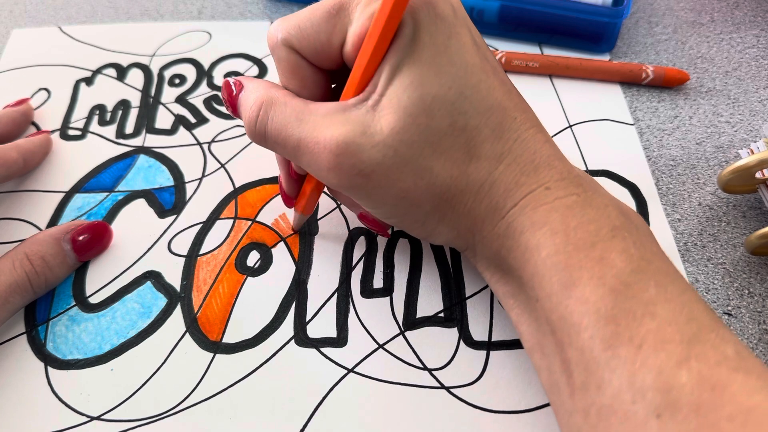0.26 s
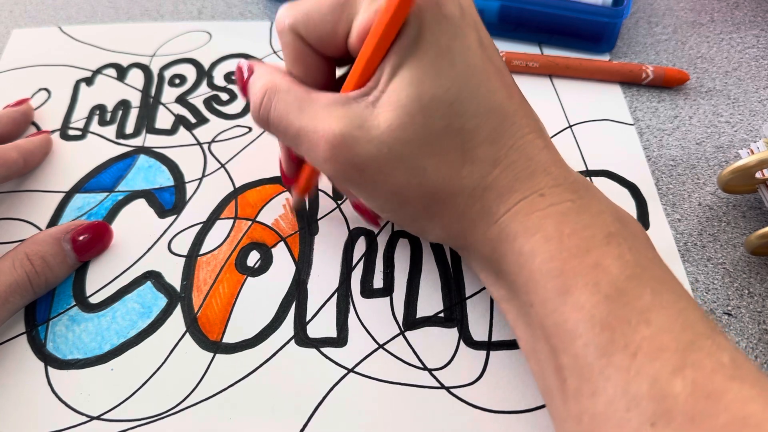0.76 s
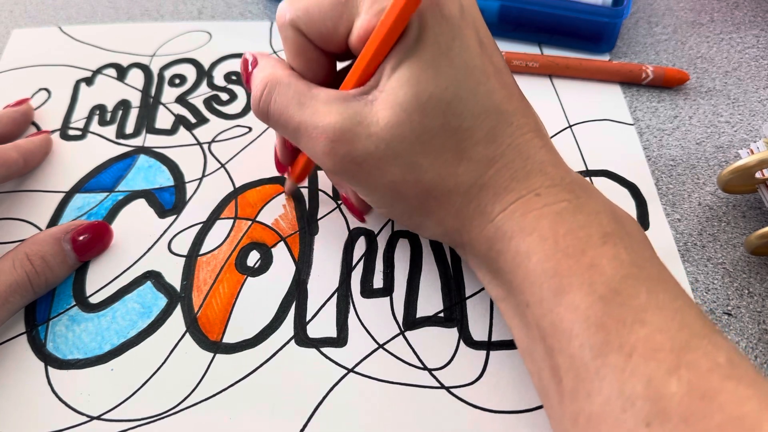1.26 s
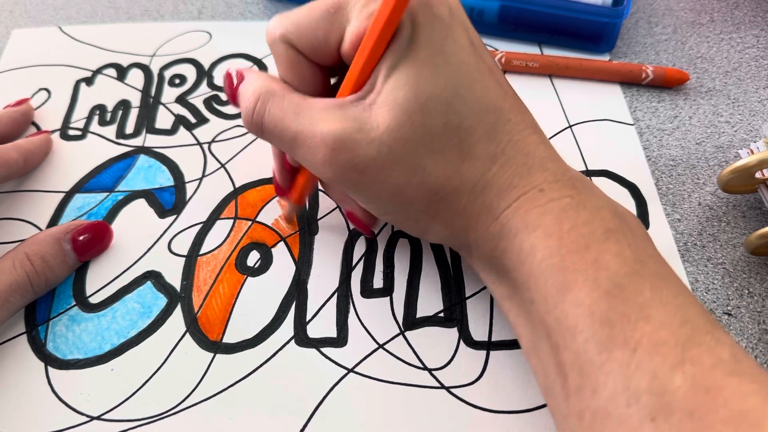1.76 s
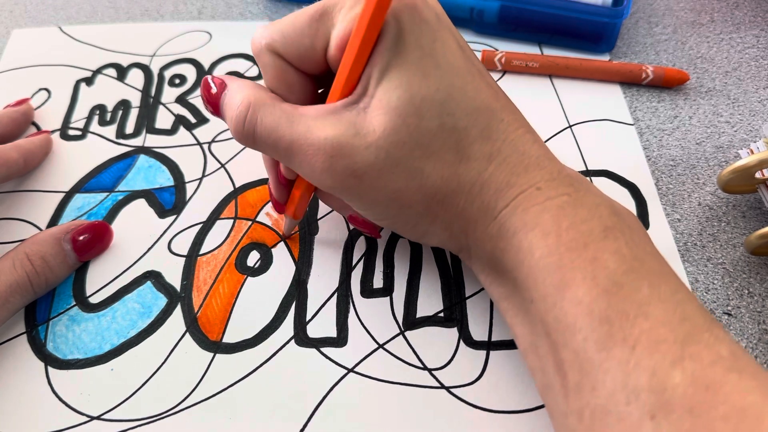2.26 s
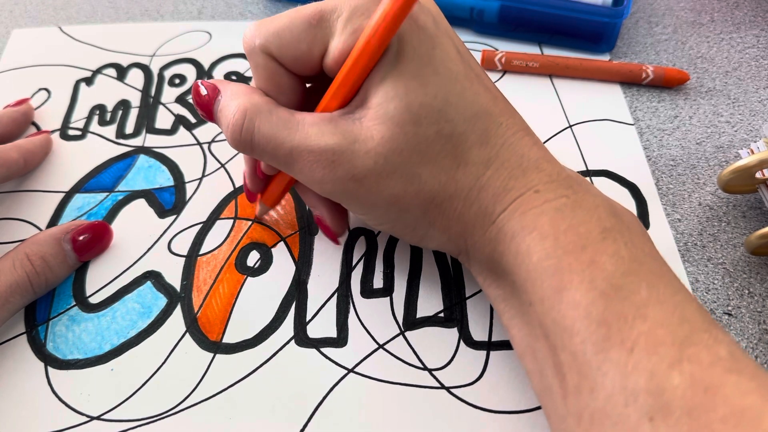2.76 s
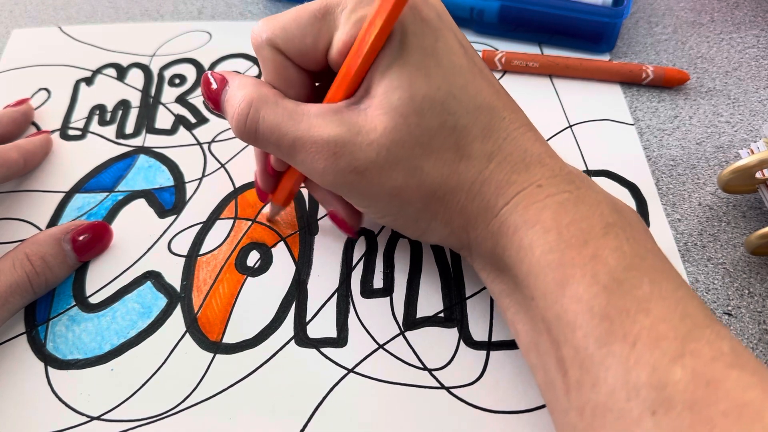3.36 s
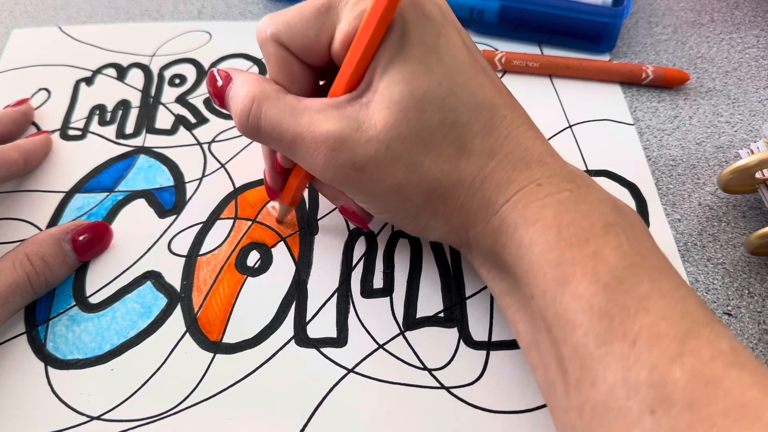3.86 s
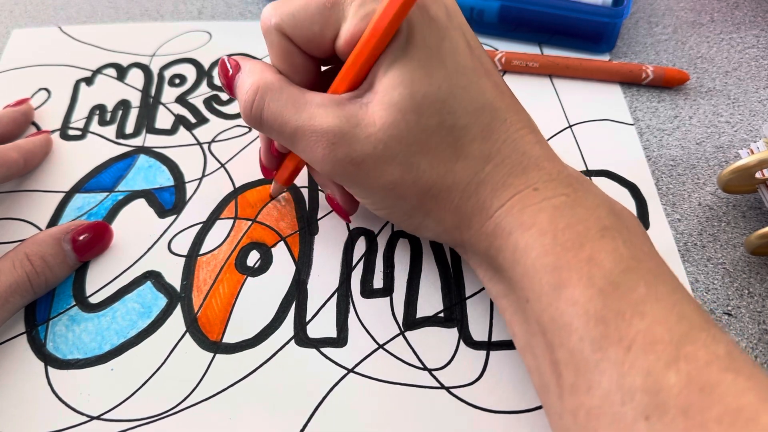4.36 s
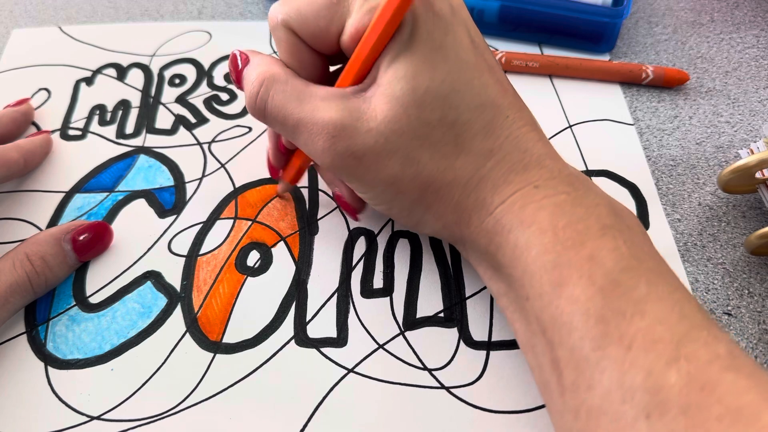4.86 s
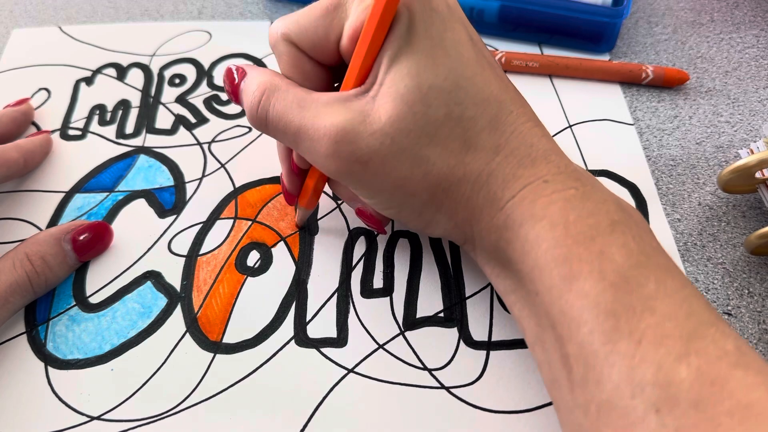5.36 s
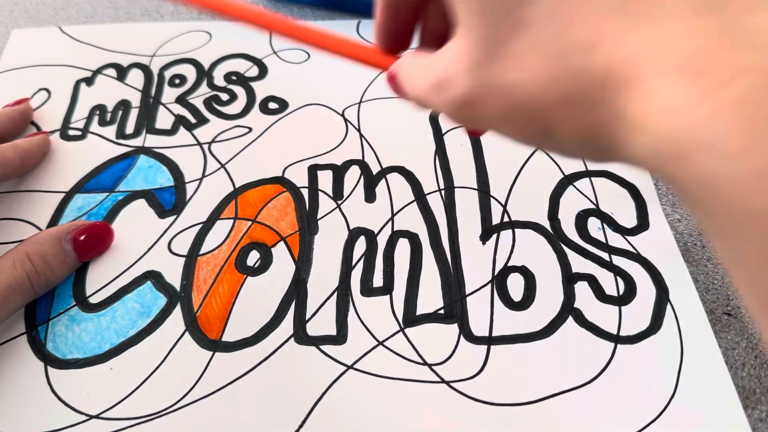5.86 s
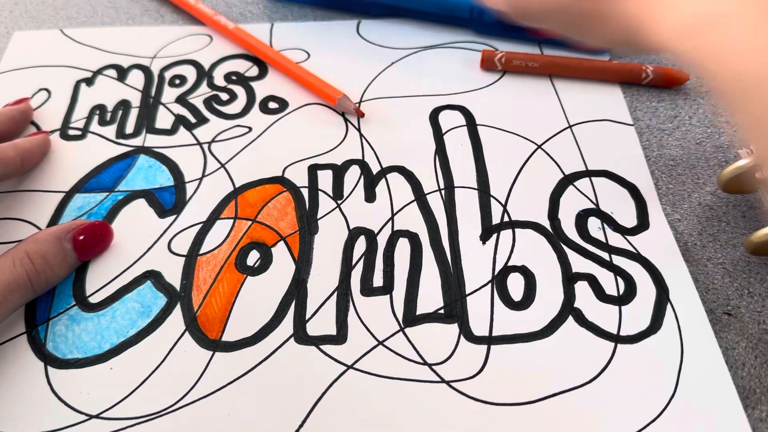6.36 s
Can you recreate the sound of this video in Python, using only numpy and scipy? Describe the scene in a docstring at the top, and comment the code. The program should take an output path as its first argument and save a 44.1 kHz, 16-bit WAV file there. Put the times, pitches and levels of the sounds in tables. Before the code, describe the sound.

A pencil scratches paper in rapid, crisp back-and-forth strokes over low ventilation hum, then stops and drops onto the desk with one sharp clack.

```python
"""A coloured pencil shades paper on a desk in quick back-and-forth strokes: friction noise in the pencil's and
the desk board's resonances, shaped by stroke speed, close under a two-port phone microphone.
The hand lifts, brushes the sheet (soft friction noise) and drops the pencil, which ticks and clacks (noise
cracks, decaying sines, desk knocks). Ventilation hums (shaped noise and a tone), the arm stirs air at the
ports, and something heavy thumps and drags once far off in the room (resonant noise and a low boom)."""
import sys
import numpy as np
from scipy import signal
from scipy.fft import rfft, irfft, next_fast_len
from scipy.io import wavfile
from scipy.ndimage import map_coordinates

SR = 44100
rng = np.random.default_rng(int(sys.argv[2]) if len(sys.argv) > 2 else 0)


def bounce(signal):
    """Save signal as a 16-bit WAV file at the path given by the first command-line argument."""
    frames = np.transpose(np.atleast_2d(signal))
    limited = np.clip(frames, -1, 1)
    pcm = np.round(limited * 32767).astype(np.int16)
    wavfile.write(sys.argv[1], SR, pcm)


N = 291942

# pencil grip: time_s, slanted_share (0 to 1)
GRIP_SLANT = [(0, 0.15), (2.3, 0), (3.2, 0.98), (6.62, 1)]


def amp(db):
    """Gain of a level in dB."""
    return 10 ** (np.asarray(db) / 20)


def unit(x):
    """Scale to rms 1."""
    return x / np.sqrt(np.mean(x ** 2) + 1e-20)


def along(points, hz):
    """Interpolate (Hz, value) points on a log frequency axis."""
    point_hz, value = np.transpose(points)
    return np.interp(np.log(hz + 1), np.log(point_hz + 1), value)


def curves(rows):
    """One value per sample for each column after the time; -120 outside the rows."""
    time_s, *columns = np.transpose(rows)
    return [np.interp(np.arange(N) / SR, time_s, column, -120, -120) for column in columns]


def wobble(rate_hz):
    """Smooth random curve with rate_hz knots a second."""
    knots = rng.standard_normal(int(N * rate_hz / SR) + 4)
    return map_coordinates(knots, [np.arange(N) * rate_hz / SR])


def hump(middle_s, length_s):
    """Smooth rise and fall from 0 to 1 and back."""
    phase = np.clip((np.arange(N) / SR - middle_s) / length_s, -.5, .5)
    return np.cos(np.pi * phase) ** 2


def filtered(x, response):
    """Apply a complex response of frequency."""
    size = next_fast_len(N + SR // 2)
    return irfft(rfft(x, size) * response(np.fft.rfftfreq(size, 1 / SR)), size)[..., :N]


def noise(spectrum, channels=1):
    """Noise of rms 1, coloured by (Hz, dB per Hz) points."""
    white = rng.standard_normal((channels, N))
    return unit(filtered(white, lambda hz: amp(along(spectrum, hz))))


def ringing(modes):
    """Noise of rms 1 through steep resonances, each applied twice, with dark valleys between."""
    def body(hz):
        return sum(amp(db) * (hz * width) ** 2 / ((center ** 2 - hz ** 2) ** 2 + (hz * width) ** 2)
                   for center, width, db in modes)
    return unit(filtered(rng.standard_normal(N), body))


def room(x):
    """Two-channel room echo: a noise tail in which each frequency dies at its own speed."""
    # frequency_hz, t60_s
    decay = [(200, 0.92), (1400, 0.32), (4000, 0.33), (10000, 0.011)]
    hz, t, grains = signal.stft(rng.standard_normal((2, SR // 2)), SR, nperseg=256)
    fade = amp(-60 * t / along(decay, hz)[:, None])
    tail = signal.istft(grains * fade, SR, nperseg=256)[1]
    delayed = np.pad(x, (300, 0))[None]  # 300 samples
    return signal.fftconvolve(delayed, tail / np.linalg.norm(tail[0]), axes=1)[:, :N]


def stereo(x, turn):
    """Spread a near source: the channels differ in level and, in the treble, by stepped phase scaled by turn."""
    # phase between the channels, nearly flat steps: frequency_hz, phase_offset_cycles
    phase_steps = [(100, 0), (7900, 0), (9200, .5), (10400, .5), (11600, 1), (13000, 1), (14200, 1.5),
                   (16000, 1.5)]
    # frequency_hz, left_minus_right_db
    tilt = [(100, -10.5), (1800, -1.5), (3000, -3.5), (6400, -4.5), (7500, -2), (16000, 2)]

    def response(hz):
        log_gain = along(tilt, hz) * np.log(10) / 40  # half the difference to each channel
        phase_rad = np.pi * turn * along(phase_steps, hz)
        return np.exp(np.array([[1], [-1]]) * (log_gain + 1j * phase_rad))
    return filtered(x, response)


def ventilation():
    """A broad drone and a slightly unsteady hum; the bass is alike in both ports."""
    # frequency_hz, level_db_per_hz
    drone_spectrum = [(50, -19.5), (85, -8), (123, 2), (155, -2.5), (195, 0.5), (250, -9.5), (317, -10.5),
                      (600, -26.5), (1080, -30.5), (1300, -37.5), (1670, -35.5), (3000, -47), (6000, -57.5),
                      (9000, -89)]
    # frequency_hz, side_re_mid_db
    stereo_width = [(60, -28), (160, -14), (270, -7), (450, -5.5), (740, 2.5), (1220, 0), (2400, -3.5),
                    (5000, 1)]
    drone_db, hum_hz, hum_db = -45.5, 119.4, -51

    mid, other = noise(drone_spectrum, channels=2) * amp(drone_db + 0.36 * wobble(2.8))
    side = filtered(other, lambda hz: amp(along(stereo_width, hz)))

    hum_phase = 2 * np.pi * hum_hz * np.arange(N) / SR + 0.75 * wobble(9.4)
    hum = amp(hum_db + 1.24 * wobble(18)) * np.sin(hum_phase)
    return mid + hum + np.array([side, -side])


def rumble_and_boom():
    """Low noise: the duct's rumble, swelling once, lifted earlier into the low boom of the distant thump."""
    # frequency_hz, level_db_per_hz
    low_spectrum = [(20, -30), (35, 3), (55, 15.5), (75, 8.5), (100, -15.5), (150, -71)]
    # thump boom, then duct swell: middle_s, length_s, rise_db
    thump_boom, duct_swell = [(.66, .5, 10), (2.17, .55, 11)]
    rumble_db = -52

    boom_middle_s, boom_length_s, boom_rise_db = thump_boom
    swell_middle_s, swell_length_s, swell_rise_db = duct_swell
    boom_db = boom_rise_db * hump(boom_middle_s, boom_length_s)
    swell_db = swell_rise_db * hump(swell_middle_s, swell_length_s)
    gain = amp(rumble_db + 2.7 * wobble(3.96) + swell_db + boom_db)
    return gain * (noise(low_spectrum) + 0.13 * noise(low_spectrum, channels=2))


def draught():
    """The moving arm pushes air at the ports: low noise, independent at each."""
    # time_s, level_db
    air_level = [(0, -101), (5.6, -90), (5.85, -44), (6.1, -53), (6.62, -50)]
    # frequency_hz, level_db_per_hz
    puff = [(20, -11.5), (45, 8), (120, 39), (300, 2), (500, -113)]
    return amp(curves(air_level)[0] + 2.9 * wobble(17)) * noise(puff, channels=2)


def scrape():
    """Something heavy lands and judders on the floor: a low body and a rasp dulled by distance."""
    # body resonances: center_hz, width_hz, level_db
    heavy_body = [(63.5, 45, -12), (201, 40, 3), (338, 230, -15)]
    # feet resonances: center_hz, width_hz, level_db
    feet_modes = [(480, 350, 0), (950, 600, 3), (1450, 450, 1), (2300, 800, -10)]
    start_s, length_s, attack_s, release_s = .492, 0.129, 0.0035, 0.0127
    body_db, rasp_db = -34, -53
    fade_db_per_s_khz = 114  # the higher resonances of the rasp fade first

    since_s = np.arange(N) / SR - start_s
    envelope = np.minimum(since_s / attack_s, (length_s - since_s) / release_s + 1)
    contact = np.clip(envelope, 0, 1) * amp(1.5 * wobble(70.3))
    elapsed_s = np.clip(since_s, 0, length_s)
    feet = sum(amp(db - fade_db_per_s_khz * hz / 1000 * elapsed_s) * ringing([(hz, width_hz, 0)])
               for hz, width_hz, db in feet_modes)
    rasp = filtered(contact * amp(rasp_db) * feet, lambda hz: 1 / (1 + (hz / 2200) ** 4))
    body = contact * amp(body_db) * ringing(heavy_body)
    return body, rasp


def ticks():
    """Each contact cracks, rings the pencil's modes and knocks the desk top."""
    # pencil and nail contacts: start_s, level_db, ring_re_crack_db
    contacts = [(5.4427, -63, -12), (5.592, -59, -10), (5.6277, -66, -12), (6.0745, -66, 0),
                (6.1012, -61, 3), (6.131, -67, 2), (6.1536, -67, -3), (6.1675, -23.5, -5), (6.1787, -52, 2),
                (6.192, -61, 0), (6.247, -66, -3)]
    # pencil modes: frequency_hz, level_db, t60_s
    pencil_modes = [(1080, -9, .035), (1520, -13, .025), (1830, -16, .05), (2410, -7, .05),
                    (3540, -11, .01), (4480, -3, .016), (6920, -2, .013), (8500, 1, .01), (9700, 2, .01),
                    (11300, 1, .007)]
    # desk top: frequency_hz, level_db_per_hz
    desk_top = [(120, -25), (280, 5), (600, -9), (1050, 0), (2500, -4), (4000, -13), (7000, -28)]
    knock_re_crack_db, knock_t60_s, crack_t60_s = -15, 0.14, 0.014
    # the pencil rolls off the fingers in tiny ticks
    roll_start_s, roll_end_s, roll_count = 6.103, 6.165, 14
    roll_db, roll_ring_db = -74, 4

    out, t = np.zeros(N + SR), np.arange(SR // 4) / SR
    wood = noise(desk_top)[0]
    roll = [(rng.uniform(roll_start_s, roll_end_s), rng.normal(roll_db, 3), roll_ring_db)
            for _ in range(roll_count)]
    for start_s, level_db, ring_db in contacts + roll:
        at = round(start_s * SR)
        ring = sum(amp(mode_db + rng.normal(0, 2) - 60 * t / t60_s) * np.sin(2 * np.pi * hz * t)
                   for hz, mode_db, t60_s in pencil_modes)
        crack = amp(-60 * t / crack_t60_s) * rng.standard_normal(len(t))
        knock = amp(knock_re_crack_db - 60 * t / knock_t60_s) * np.roll(wood, -at)[:len(t)]
        out[at:][:len(t)] += amp(level_db) * (crack + amp(ring_db) * ring + knock)
    return out[:N]


def lead():
    """Friction hiss in lead, shaft and sheet resonances; the highest follow the grip's slant."""
    # center_hz, width_hz, level_db
    tip = [(3400, 900, -9), (4500, 550, -7.5), (5500, 450, -10), (6500, 450, -4), (7300, 550, -2),
           (8650, 950, 2), (10000, 450, 1.5), (10900, 650, -2), (11750, 350, -3), (12350, 600, -1.5),
           (13500, 550, -4)]
    # highest resonances, upright grip: center_hz, width_hz, level_db
    upright = [(14650, 500, -6), (15350, 750, 3)]
    # highest resonances, slanted grip: center_hz, width_hz, level_db
    slanted = [(14350, 650, -1), (15400, 900, -5)]
    mix_rad = np.pi / 2 * np.clip(curves(GRIP_SLANT)[0], 0, 1)
    return np.cos(mix_rad) * ringing(tip + upright) + np.sin(mix_rad) * ringing(tip + slanted)


def brush():
    """Skin rubs the sheet faintly, more as the hand slides: noise in the same resonances as the lead."""
    # hand lying on the sheet, then lifted: time_s, level_db
    resting = [(0, -81), (5.4, -83.5), (5.75, -92.5), (6.62, -97)]
    # skin slides: middle_s, length_s, level_db
    skin_slides = [(5.376, .03, -80), (5.461, 0.037, -64.5), (5.503, 0.072, -77.5), (5.655, .14, -88),
                   (6.127, 0.14, -84), (6.217, 0.18, -71.5), (6.416, 0.39, -96)]
    slides = sum(amp(db) * hump(middle_s, length_s) for middle_s, length_s, db in skin_slides)
    return (amp(curves(resting)[0]) + slides) * amp(1.5 * wobble(60)) * lead()


def strokes(margin=0.067, round_=0.76, lean=0.29, slope=0.65):
    """The lead hisses over the paper's tooth with its speed and quietens at each turn."""
    # alternately pull and push: start_s, end_s, level_db
    stroke_rows = [(-0.04, 0.031, -57), (0.092, 0.144, -52.5), (0.176, 0.246, -57), (0.304, 0.363, -51),
                   (0.4, 0.472, -55), (0.52, 0.59, -50), (0.631, 0.701, -52), (0.753, 0.824, -51),
                   (0.853, 0.925, -53.5), (0.964, 1.032, -53.5), (1.06, 1.132, -56), (1.168, 1.239, -55.5),
                   (1.264, 1.342, -55.5), (1.38, 1.446, -54.5), (1.486, 1.561, -54), (1.606, 1.67, -52.5),
                   (1.709, 1.78, -53.5), (1.829, 1.883, -52), (1.925, 1.991, -54.5), (2.036, 2.087, -53),
                   (2.132, 2.2, -56.5), (2.256, 2.311, -54), (2.356, 2.416, -58), (2.472, 2.531, -55.5),
                   (2.575, 2.627, -59.5), (2.682, 2.728, -60.5), (2.762, 2.8, -62.5), (2.874, 2.915, -61),
                   (2.961, 3.001, -66.5), (3.05, 3.098, -60), (3.139, 3.187, -61), (3.244, 3.289, -58.5),
                   (3.336, 3.4, -62), (3.451, 3.497, -54.5), (3.547, 3.607, -58.5), (3.65, 3.705, -54.5),
                   (3.76, 3.821, -56), (3.873, 3.924, -52.5), (3.978, 4.047, -59), (4.095, 4.151, -55),
                   (4.197, 4.263, -57.5), (4.314, 4.368, -54.5), (4.415, 4.483, -58.5),
                   (4.538, 4.59, -55.5), (4.634, 4.695, -59.5), (4.746, 4.793, -56), (4.839, 4.898, -61.5),
                   (4.956, 5.003, -56.5), (5.058, 5.116, -60.5), (5.167, 5.2, -61.5), (5.24, 5.327, -57.5)]
    # board under the sheet: center_hz, width_hz, level_db
    desk_board = [(1100, 200, -2), (1590, 380, -4), (2050, 330, 5), (2770, 1200, -8)]
    pull_change_db, pull_desk_db = -3, -12.5  # end minus start, board re hiss
    push_change_db, push_desk_db = 0.22, -9.5
    slant_desk_db = -0.5  # board level change at full slant

    t, hiss, board = np.arange(N) / SR, np.zeros(N), np.zeros(N)
    for k, (start_s, end_s, level_db) in enumerate(stroke_rows):
        pushed = k % 2
        change_db = push_change_db if pushed else pull_change_db
        desk_db = push_desk_db if pushed else pull_desk_db
        part = slice(max(round((start_s - .03) * SR), 0), round((end_s + .03) * SR))
        progress = (t[part] - start_s) / (end_s - start_s)
        u = np.clip((progress + margin) / (1 + 2 * margin), 0, 1)
        # a pulled stroke bites at once and slows down; a pushed one swells evenly
        arc = np.abs(np.sin(np.pi * u ** np.exp(lean * change_db))) ** round_
        speed = arc * amp(slope * change_db * (u - .5))
        hiss[part] += amp(level_db) * speed
        board[part] += amp(level_db + desk_db) * speed ** 1.18
    tooth = amp(0.49 * wobble(120) + 0.21 * wobble(400))  # uneven paper grain
    board_gain = amp(slant_desk_db * curves(GRIP_SLANT)[0] + 2.1 * wobble(50))
    return tooth * (hiss * lead() + board * board_gain * ringing(desk_board))


def scene():
    """Near sounds in stereo, the far scrape, room echoes of both, low boom and the moving air."""
    rub = strokes() + brush()
    hits = ticks()
    body, rasp = scrape()
    # the hand shades the treble of the hits' echoes
    dull_hits = amp(-13) * filtered(hits, lambda hz: 1 / (1 + (hz / 3400) ** 4))
    echoes = room(amp(-12.0) * rub + dull_hits + amp(-16) * body + amp(4.5) * rasp)
    near = stereo(rub, turn=1) + stereo(hits, turn=.85)
    air = ventilation() + rumble_and_boom() + draught()
    return near + body + rasp + echoes + air


def record(dry):
    """Each port adds its own hiss; the phone keeps nothing above its band limit."""
    # microphone hiss: frequency_hz, level_db_per_hz
    hiss_spectrum = [(3000, -21), (6000, 12), (9000, 7), (11500, -42), (14500, 8.5), (16000, -19)]
    hiss_db, band_edge_hz = -85.5, 15830
    hiss = amp(hiss_db) * noise(hiss_spectrum, channels=2)
    return filtered(dry + hiss, lambda hz: np.clip((band_edge_hz - hz) / 250 + .5, 0, 1) ** 2)


dry = scene()
out = record(dry)
bounce(out)
```